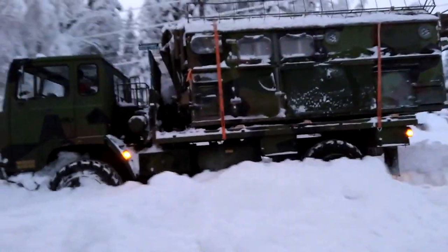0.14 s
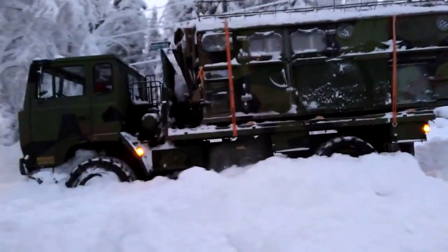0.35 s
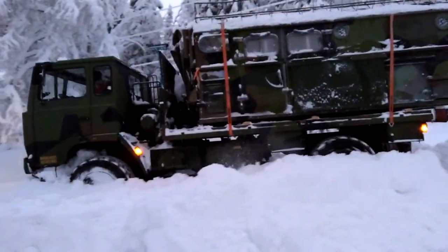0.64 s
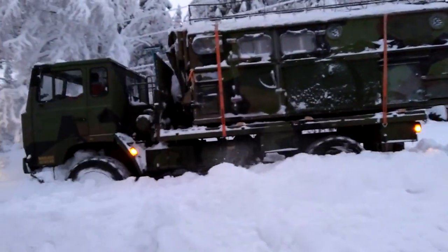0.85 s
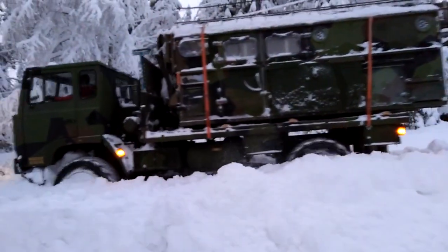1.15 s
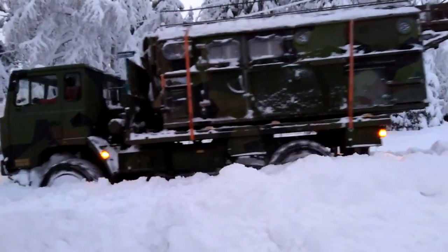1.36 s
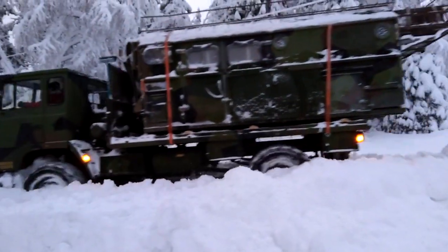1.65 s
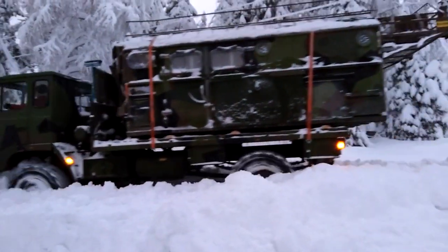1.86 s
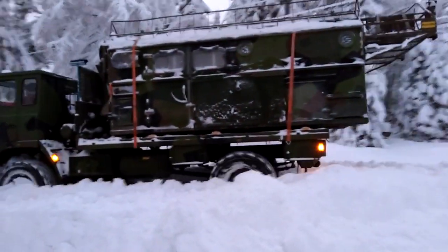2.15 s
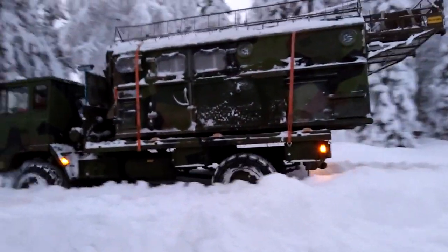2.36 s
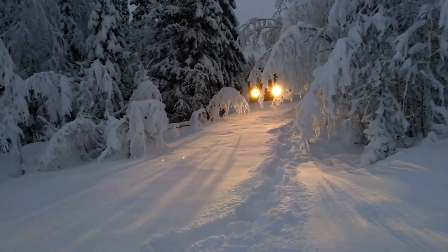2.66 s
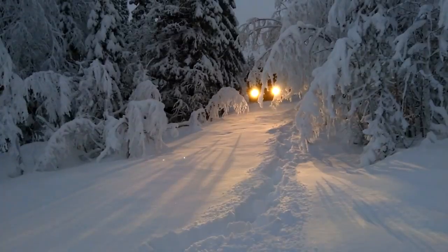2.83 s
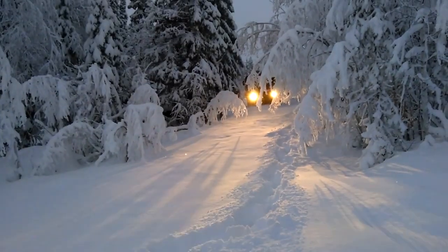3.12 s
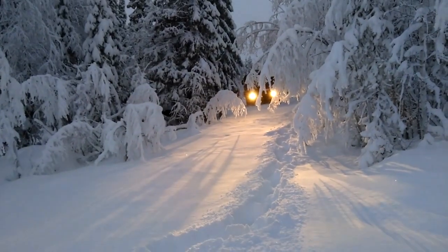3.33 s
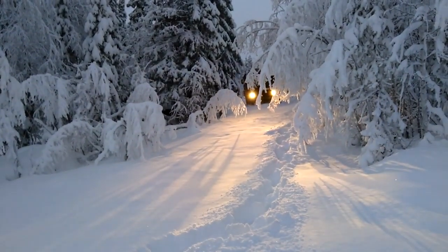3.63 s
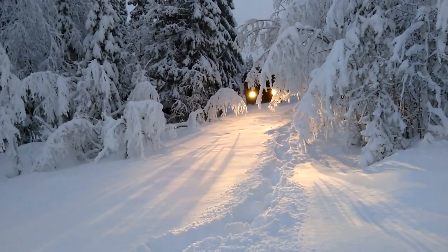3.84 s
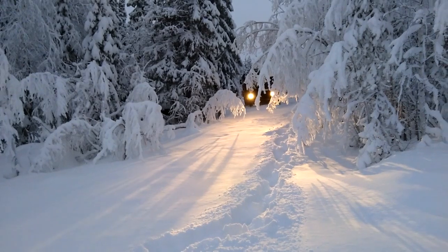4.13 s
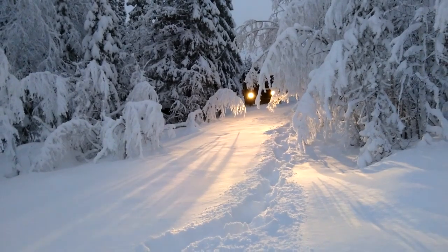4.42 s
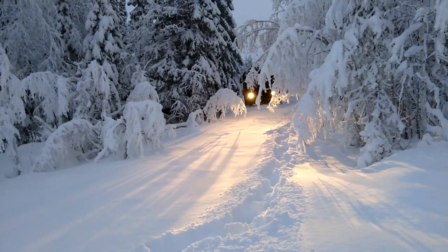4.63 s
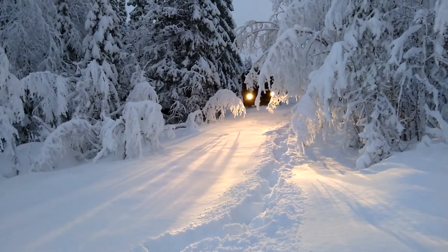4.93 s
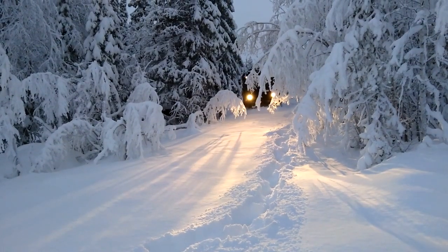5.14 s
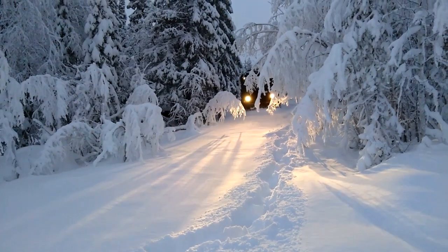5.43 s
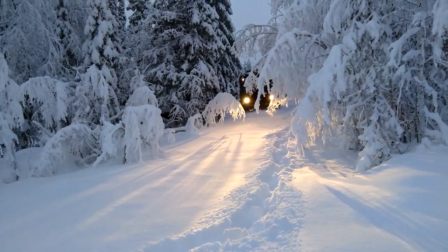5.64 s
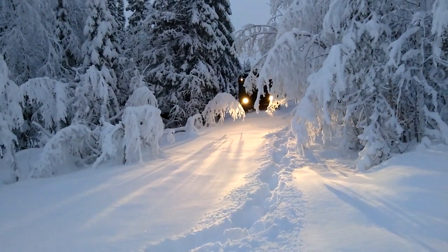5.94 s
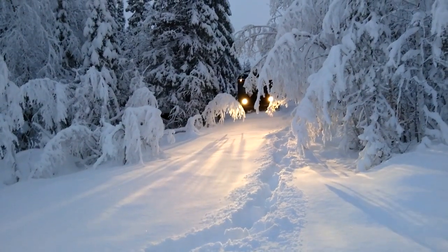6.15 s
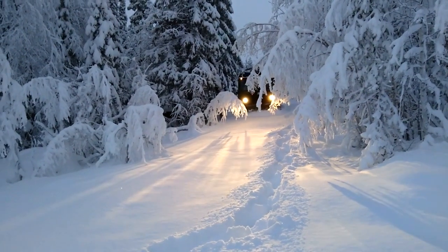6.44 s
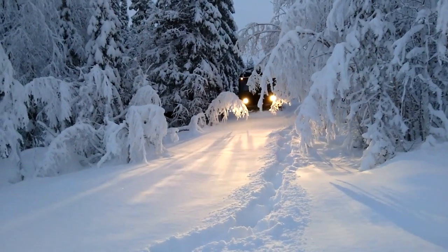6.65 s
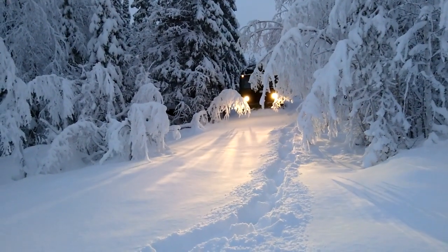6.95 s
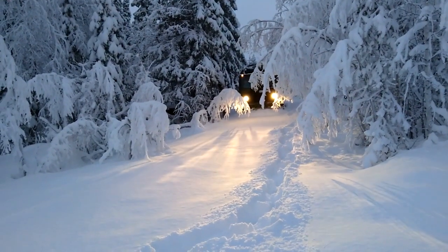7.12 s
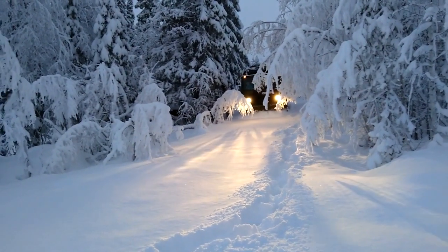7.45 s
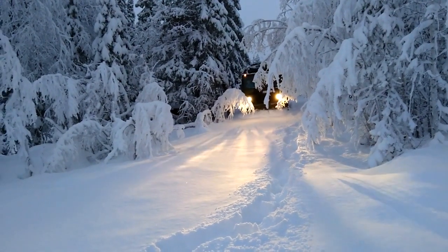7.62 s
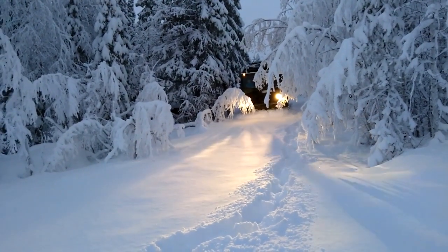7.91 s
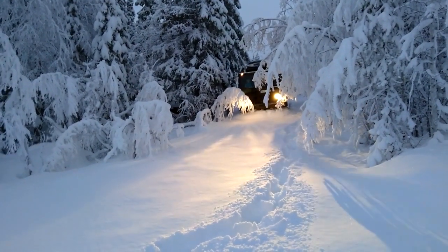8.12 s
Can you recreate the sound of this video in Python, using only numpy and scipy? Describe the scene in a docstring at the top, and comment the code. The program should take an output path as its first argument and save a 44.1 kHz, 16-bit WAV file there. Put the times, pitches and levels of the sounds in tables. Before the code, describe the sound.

Close diesel truck drone and clatter with squeaking snow under the tyres, cutting to the same engine faint and crawling nearer.

```python
"""A six-cylinder diesel truck labours past through deep snow. Periodic firing pulses make its exhaust
drone; the same firings knock the block, rattle loose parts, ring steel panels and tick the injectors.
Under the tyres the snow fractures and squeaks. Then, abruptly, the truck is far down a forest road,
crawling nearer at low revs, with a hollow chuff once in every engine cycle."""
import sys
import numpy as np
from scipy import signal
from scipy.fft import rfft, irfft, next_fast_len
from scipy.io import wavfile
from scipy.ndimage import uniform_filter1d, map_coordinates

SR = 44100
rng = np.random.default_rng(int(sys.argv[2]) if len(sys.argv) > 2 else 0)


def unload_wav(signal):
    """Save mono or channel-first audio to the path in sys.argv[1] as 16-bit WAV at rate SR, clipped to [-1, 1]."""
    wavfile.write(
        sys.argv[1],
        SR,
        np.round(np.clip(np.atleast_2d(signal).T, -1, 1) * 32767).astype(np.int16),
    )


N = 365148
TIME = np.arange(N) / SR
BURST_TIME = np.arange(SR // 16) / SR
FAR_START_S = 2.6533

# Engine speed. Each row: time in seconds, crank speed in rpm.
NEAR_RPM = [(0, 976), (0.6, 1118), (0.9, 1212), (1.25, 1258), (1.5, 1209), (1.75, 1197), (2.1, 1222),
            (2.4, 1203), (2.66, 1185)]
FAR_RPM = [(2.66, 972), (3.2, 984), (3.7, 987), (4.95, 972), (5.35, 961), (5.7, 942), (6.5, 958), (7, 951),
           (8.28, 961)]
def engine_cycles(speed):
    """Phase is the integral of speed; a four-stroke cycle takes two crank turns."""
    turned = np.cumsum(curves(speed)[0]) / (120 * SR)
    return turned - np.interp(speed[0][0], TIME, turned)

# Exhaust harmonics. Each row: multiple of the cycle rate, relative level in dB.
NEAR_ORDERS = [(4, -25), (5, -23.5), (6, 0), (7, -23), (9, -19.5), (11, -28), (12, -28), (15, -31),
               (20, -32), (21, -32), (22, -33), (24, -32), (26, -32), (27, -36), (29, -36), (30, -35),
               (31, -38)]
FAR_ORDERS = [(5, -12), (6, 1), (7, -17), (9, -11), (11, -22), (12, -7), (15, -17), (29, -23)]
def exhaust(cycle, orders, flutter_db, lug_db=0):
    """Periodic pulses form a harmonic series: order 6 is the firing rate; unequal cylinders add others."""
    tones = sum(amp(db + (round(k) > 6) * lug_db) * np.sin(2 * np.pi * (round(k) * cycle + rng.random()))
                for k, db in orders)
    return np.sqrt(2) * tones * amp(flutter_db * wobble(15))

# Engine effort. Each row: time in seconds, base level of the exhaust in dB.
EFFORT = [(0.0, -26.5), (0.02, -26.5), (0.6, -23), (0.63, -22.5), (1.26, -20.5), (1.36, -23), (2.14, -22.5),
          (2.62, -25)]
def loaded_exhaust(cycle, effort_db, working_rpm=1186, lug_db_per_rpm=0.0297):
    """Load strengthens the pulses; lugging below working speed hardens their overtones."""
    lug_db = lug_db_per_rpm * np.maximum(working_rpm - curves(NEAR_RPM)[0], 0)
    return amp(effort_db + 0.17) * exhaust(cycle, NEAR_ORDERS, flutter_db=0, lug_db=lug_db)

# Firings. Each row: place in the cycle in firings (0-6), relative rattle and tick levels in dB.
NEAR_KNOCKS = [(0.33, -1, 14), (1.33, 0.5, 15), (2.3, 0, 14.5), (3.3, -1, 15), (4.35, -1.5, 11.5),
               (5.38, -2, 9)]
FAR_KNOCKS = [(0.02, -1, 1), (1.05, 0, -1), (2.1, -1, -2), (2.97, 0, 1), (4.1, -2, -5), (5.0, 0, 1.5)]
def clatter(cycle, knocks, tick_s, tail_db, memory, scatter_db):
    """Impact excitation: each firing gives a rattle of loose parts and an injector tick's envelope."""
    rattle, tick = np.zeros((2, N)), np.zeros(N)
    shake = swell(0.004) + amp(tail_db) * swell(0.017)  # chassis and trees prolong the rattle
    for place, rattle_db, tick_db in knocks:
        starts = each_cycle(cycle, place)
        size = amp(scatter_db * rng.standard_normal((len(starts), 1)))
        envelope = amp(rattle_db) * size * shake
        rattle += [lay(starts, envelope * alike_noise(len(starts), memory)) for _ in range(2)]
        tick += lay(starts, amp(tick_db) * size * swell(tick_s))
    return unit(rattle), unit(tick)

# Block and chassis spectra. Each row: frequency in Hz, relative spectral density in dB.
NEAR_BLOCK = [(240, -14.5), (400, -26), (453, -7.5), (506, -0.5), (678, 2), (800, 0.5), (956, 1),
              (1050, 1.5), (1230, 1.5), (1500, -3.5), (1640, -2), (1930, -1), (2110, -15), (2300, -40),
              (2990, -43), (5060, -120)]
FAR_BLOCK = [(240, -31), (420, -30), (500, -3), (532, -7), (590, -1), (673, -5), (729, -4), (850, -2),
             (1040, -0.5), (1130, -4), (1330, -7.5), (1480, -13), (1700, -9), (1960, -10), (2300, -25),
             (2990, -85), (5060, -120)]
NEAR_BOOM = [(59, -10), (100, 4), (161, -6.5), (193, -6), (258, -2), (392, -10), (430, -18.5), (560, -47),
             (950, -120)]
FAR_BOOM = [(65, -23), (110, 0.5), (124, -4.5), (156, -5.5), (392, -8), (430, -4.5), (560, -15),
            (950, -120)]
def structure(rattle, spectrum, noise_gain):
    """Forced vibration: the block or chassis filters the rattle and a steady noise."""
    return coloured(rattle + noise_gain * noise(), spectrum)

# Panel modes. Each row: place in firings (0-6), frequency in Hz, first and second relative level in dB.
NEAR_RINGS = [(0.36, 860, -29.5, -35), (0.45, 1930, -38, -33), (0.8, 1940, -42, -35),
              (1.1, 1890, -36.5, -38), (1.3, 775, -36, -29), (1.42, 2950, -35.5, -41),
              (1.43, 1290, -31, -39), (1.46, 970, -28, -31), (1.49, 1810, -34.5, -41),
              (2.33, 1850, -35.5, -38), (2.36, 2880, -34.5, -45), (2.36, 3490, -36.5, -46),
              (2.37, 860, -24, -25.5), (2.55, 1290, -35, -31), (3.3, 890, -27.5, -26.5),
              (3.42, 2950, -34.5, -48), (3.42, 3480, -38, -47), (3.5, 1780, -36, -36),
              (4.37, 1890, -33, -44), (4.4, 2850, -38, -47), (4.42, 950, -28.5, -37), (4.62, 710, -42, -31),
              (5.28, 1310, -39, -33), (5.41, 900, -29.5, -36), (5.43, 1790, -35, -44)]  # from beside the engine, then from behind
FAR_RINGS = [(0.12, 1940, -55, -56), (0.17, 990, -38, -41.5), (0.93, 1660, -51, -56),
             (0.96, 990, -41.5, -40.5), (1.02, 560, -45, -44), (1.12, 1980, -64, -52),
             (1.33, 1290, -49, -49), (2.0, 1780, -60, -50), (2.09, 960, -39, -38), (2.4, 970, -41, -49),
             (2.9, 970, -42.5, -38), (3.0, 1720, -52, -48), (3.1, 530, -49, -46), (3.3, 1080, -45, -50),
             (3.64, 950, -43, -47), (4.14, 990, -34, -37.5), (4.2, 1660, -65, -50), (4.98, 1750, -55, -45),
             (5.0, 600, -48, -44), (5.02, 860, -39, -39), (5.36, 970, -44, -50), (5.42, 1940, -54, -52),
             (5.62, 950, -46, -52), (5.86, 990, -58, -43.5)]  # far up the road, then nearer
def panels(cycle, rings, turn_s, turn_length_s, rise_at_1khz_s, scatter_db):
    """Pistons and valve gear strike damped modes; directivity shifts their balance as the truck moves."""
    track = np.zeros(N)
    turned = (1 + np.tanh((TIME - turn_s) / turn_length_s)) / 2
    for place, hz, first_db, second_db in rings:
        starts = each_cycle(cycle, place)
        force, detune = rng.standard_normal((len(starts), 2)).T[..., None]
        db = first_db + (second_db - first_db) * turned[starts, None] + scatter_db * force
        blow = swell(rise_at_1khz_s * (1000 / hz) ** 0.3) ** 2
        tone = np.sin(2 * np.pi * hz * (1 + 0.005 * detune) * BURST_TIME)
        track += lay(starts, amp(db) * blow * tone)
    return track

# Cover modes. Each row: frequency in Hz, bandwidth in Hz, relative level in dB.
COVER_MODES = [(915, 110, 2), (1222, 77, -3), (1890, 59, -8), (2904, 120, -2), (3520, 98, -3),
               (4080, 130, -15), (4900, 140, -14)]
def covers(rattle):
    """Thin steel covers respond to the engine's shaking as second-order resonators."""
    def response(f):
        return sum(amp(db) * 1j * f * width / (hz * hz - f * f + 1j * f * width)
                   for hz, width, db in COVER_MODES)
    return unit(filtered(rattle, response))

# Injector spectra. Each row: frequency in Hz, relative spectral density in dB.
NEAR_HISS = [(1290, -22), (2150, -0.5), (2420, 3.5), (2650, -2), (2940, 2.5), (3130, 0), (3480, 0.5),
             (3700, -3.5), (4150, 2.5), (4500, -5), (5330, -7), (5880, -9), (6250, -4), (6750, -4.5),
             (7500, -18.5), (8070, -21.5), (11400, -15.5), (12600, -24), (14300, -19)]
FAR_HISS = [(1290, -9.5), (2200, -7.5), (2550, -5), (2800, -2.5), (3120, -4), (3240, 1), (3600, -3.5),
            (3900, 2.5), (4150, -3.5), (4380, 1), (4600, -1.5), (5130, -1.5), (5950, -11.5), (6330, -8.5),
            (6800, -10), (8270, -18), (13800, -28.5), (14300, -37)]
def injectors(rattle, tick, spectrum, ripple_db, spacing_hz):
    """Ticks modulate a hiss, coloured by the many narrow resonances of the engine's castings."""
    ticking = (1 + tick) * noise() + 0.7 * rattle
    grid = np.arange(0, SR / 2, spacing_hz)
    heights = np.clip(rng.standard_normal(4096)[:len(grid)], -2.5, 1.2)
    rippled = filtered(ticking, lambda hz: amp(ripple_db * np.interp(hz, grid, heights)))
    return coloured(rippled, spectrum)

def whine(turns, waver_db, jitter_turns=0):
    """A rotating part hums at a multiple of engine speed, with slight phase modulation."""
    phase = turns + jitter_turns * wobble(30)
    tone = np.sin(2 * np.pi * phase + 0.04 * wobble(3.16))
    return unit(tone * amp(waver_db * wobble(5.5)))

# Gear hums. Each row: multiple of the cycle rate, relative level in dB.
GEAR_ORDERS = [(63, -3), (69, -6), (72, -4), (75, 0)]
def gears(cycle):
    """High harmonics of the cycle, likely from the meshing of the timing gears."""
    return sum(amp(db) * whine(k * cycle, waver_db=2.5, jitter_turns=0.036) for k, db in GEAR_ORDERS)

def chuff(cycle, centre_hz, width_hz, place, spread_rad):
    """Band-limited noise gated once a cycle: a hollow puff, likely the air compressor's intake."""
    gate = np.exp((np.cos(2 * np.pi * (cycle - place / 6)) - 1) / spread_rad ** 2)
    puff = filtered(gate * noise(), lambda hz: 1 / (1 + (2 * (hz - centre_hz) / width_hz) ** 2))
    return amp(-58.5) * hump(6.04, 2.7) * unit(puff)

# Load bed spectrum. Each row: frequency in Hz, relative spectral density in dB.
BED_TONE = [(450, -39), (600, 7), (800, 11), (950, -18), (1300, -55)]
def load_bed(rattle):
    """The bed drums in forced vibration, loudest as the rear comes by."""
    return amp(-48.5) * hump(2.1, 0.37) * coloured(rattle, BED_TONE)

# An axle in a drift. Each row: peak time in seconds, half-width in seconds, level in dB.
DRIFTS = [(0.033, 1, -46), (1.827, 0.95, -47.5)]
# Crunch spectrum. Each row: frequency in Hz, relative spectral density in dB.
CRUNCH = [(1200, -24), (3000, 0.5), (4900, 9), (6200, -3.5), (8000, -4), (11500, -7.5), (14000, -18)]
def snow(grains_per_s, clump_db):
    """Brittle fracture: the tyres crush the crust in clumps of tiny cracks."""
    cracks = (rng.random(N) < grains_per_s / SR) * noise()
    ploughing = sum(amp(db) * hump(s, length) for s, length, db in DRIFTS)
    return ploughing * coloured(cracks * amp(clump_db * wobble(38.4)), CRUNCH)

# Packed snow under a tyre, and a loose steel fitting as the rear rocks by.
# Each row: start in seconds, level in dB, frequency in Hz.
SNOW_SQUEAKS = [(0.186, -43, 4820), (0.299, -39.5, 5430), (0.598, -42, 5510), (1.003, -40.5, 5250),
                (1.57, -46, 4950), (1.722, -45, 4370), (1.755, -44, 5050), (1.787, -39, 5170),
                (1.885, -45, 5200), (2.1, -46, 5000), (2.178, -47, 5200), (2.3, -44, 4570),
                (2.318, -46, 5000), (2.417, -45, 5300), (2.464, -45.5, 5300), (2.522, -45, 4560)]
FITTING_CHATTER = [(1.868, -39, 1900), (2.052, -41, 1950), (2.117, -39.5, 1900), (2.168, -39.5, 1880),
                   (2.272, -40, 1890), (2.308, -41, 1950), (2.372, -41.5, 1930)]
def rasps(events, peak_s, width_hz):
    """Random modulation widens a tone into a narrow band: a short squeak or chatter."""
    track = np.zeros(N)
    for s, db, hz in events:
        roughness = uniform_filter1d(rng.standard_normal(len(BURST_TIME)), int(SR / width_hz))
        rasp = unit(roughness * np.sin(2 * np.pi * hz * BURST_TIME))
        track[int(s * SR):][:len(BURST_TIME)] += amp(db) * swell(peak_s) * rasp
    return track

def near_truck(abreast_s=0.36, speed_m_per_s=3.62, distance_m=4.05):
    """Engine noise follows effort and spherical spreading; the knock is sharpest where it is loudest."""
    cycle = engine_cycles(NEAR_RPM)
    effort_db, = curves(EFFORT)
    nearness = distance_m / np.hypot(distance_m, speed_m_per_s * (TIME - abreast_s))
    drive_db = 0.61 * (effort_db - effort_db.max()) + 20 * np.log10(nearness)
    drive, soft_drive = amp(drive_db), amp(0.41 * drive_db)
    sharpness = amp(5.2 * (drive_db - drive_db.max()))
    rattle, tick = clatter(cycle, NEAR_KNOCKS, tick_s=0.005, tail_db=-4, memory=0.87, scatter_db=0.5)
    tick *= 0.2 + 0.64 * sharpness
    pair = amp(-40.5) * soft_drive * structure(rattle, NEAR_BOOM, noise_gain=0.71)
    pair += amp(-32.5) * drive * structure(rattle, NEAR_BLOCK, noise_gain=0.45)
    pair += amp(-39) * drive * sharpness * covers(rattle)
    pair += amp(-40.5) * soft_drive * injectors(rattle, tick, NEAR_HISS, ripple_db=3.5, spacing_hz=30)
    pair += snow(grains_per_s=6000, clump_db=2.5) + load_bed(rattle)
    rings = panels(cycle, NEAR_RINGS, turn_s=1.5, turn_length_s=0.3, rise_at_1khz_s=0.0026, scatter_db=1)
    pair[0] += amp(0.5) * drive * rings
    pair[0] += rasps(SNOW_SQUEAKS, peak_s=0.005, width_hz=900)
    pair[0] += rasps(FITTING_CHATTER, peak_s=0.007, width_hz=160)
    drone = loaded_exhaust(cycle, effort_db)
    drone += amp(-46.5) * soft_drive * whine(19.22 * cycle, waver_db=2.5)  # belt
    drone += amp(-54.5) * hump(1.88, 0.62) * whine(53.2 * cycle, waver_db=0)  # driveline
    return stereo(pair, NEAR_WIDTH, NEAR_LEAN, direct=0.61) + pan(drone, balance_db=0.94, lag_samples=4)

# The approach. Each entry, by part: starting base level in dB, rise in dB per second.
APPROACH = {"exhaust": (-52, 0.83), "boom": (-65.5, 1.4), "hiss": (-58.5, 0.57),
            "bright clatter": (-83, 3.8), "block": (-51.5, 0.84), "gears": (-67.5, 1.8)}
def nearing(part):
    """Each part's gain grows exponentially as the far truck nears."""
    first_db, db_per_s = APPROACH[part]
    return amp(first_db + db_per_s * (TIME - FAR_START_S))

def far_truck():
    """Transmission depends on frequency: the diesel knock carries best through the trees."""
    cycle = engine_cycles(FAR_RPM)
    rattle, tick = clatter(cycle, FAR_KNOCKS, tick_s=0.0037, tail_db=0, memory=0.82, scatter_db=0.6)
    pair = nearing("boom") * structure(rattle, FAR_BOOM, noise_gain=1.04)
    pair += nearing("block") * structure(rattle, FAR_BLOCK, noise_gain=0.45)
    tick *= 0.42 * amp(2.5 * wobble(900))  # each tick is a cluster of tiny clicks
    pair += nearing("hiss") * injectors(rattle, tick, FAR_HISS, ripple_db=2.5, spacing_hz=35)
    pair += chuff(cycle, centre_hz=1343, width_hz=120, place=3.72, spread_rad=0.45)
    bright = coloured(rattle, [(1450, -36), (1700, -16), (2000, 0.5), (2400, -38)])
    pair += nearing("bright clatter") * bright  # comes through as the truck clears the trees
    pair[0] += amp(0.7) * panels(cycle, FAR_RINGS, turn_s=5.7, turn_length_s=0.7,
                                 rise_at_1khz_s=0.0029, scatter_db=0.6)
    drone = amp(-2) * nearing("exhaust") * exhaust(cycle, FAR_ORDERS, flutter_db=1)
    drone += nearing("gears") * gears(cycle)
    return stereo(pair, FAR_WIDTH, FAR_LEAN, direct=0.51) + pan(drone, balance_db=1.5, lag_samples=-2)

# Background spectrum. Each row: frequency in Hz, relative spectral density in dB.
AIR = [(15, -35), (35, -20), (70, 8), (130, -14), (400, -7), (2000, -31)]
def air(white, level_db):
    """Ambient noise: a steady low rumble."""
    return amp(level_db) * coloured(white, AIR)

# Stereo width. Each row: frequency in Hz, side level relative to mid in dB.
NEAR_WIDTH = [(60, -24), (180, -23), (335, -18), (560, -14), (800, -7), (1280, -3), (1700, 5), (2090, 7),
              (2500, -1), (2940, -3), (4130, 2), (5700, 3), (6700, -7), (12000, -8)]
FAR_WIDTH = [(60, -20), (180, -16), (800, -17), (1000, -16), (1290, -7), (1690, -12), (2090, -10),
             (2500, -2), (4130, -2), (5700, 1), (6700, -12), (12000, -16)]
# Stereo phase. Each row: frequency in Hz, phase of side against mid in radians.
NEAR_LEAN = [(300, 1), (900, 1.75), (2050, 1.6), (2500, 0.3), (3500, 1.3), (4900, 1.5)]
FAR_LEAN = [(500, -0.6), (1000, -0.4), (1400, -1.1), (2500, -0.4), (3400, -1.45), (5700, -1.55)]
def stereo(pair, width, lean, direct):
    """Partial coherence: the side mixes phase-shifted direct sound with scatter, more so in the treble."""
    mid, scattered = pair
    share = lambda hz: direct / (1 + (hz / 4500) ** 2)
    gain = lambda hz: amp(along(width, hz))
    side = filtered(mid, lambda hz: np.sqrt(share(hz)) * np.exp(1j * along(lean, hz)) * gain(hz))
    side += filtered(scattered, lambda hz: np.sqrt(1 - share(hz)) * gain(hz))
    return np.array([mid + side, mid - side])

def pan(x, balance_db, lag_samples):
    """Level and time differences give direction: the right channel is quieter and shifted by the lag."""
    return np.array([x, np.roll(x, lag_samples)]) * amp([[balance_db / 2], [-balance_db / 2]])

def amp(db):
    """Decibels to gain."""
    return 10 ** (np.asarray(db) / 20)

def unit(x):
    """Normalise to rms 1."""
    return x / np.sqrt(np.mean(x ** 2) + 1e-20)

def along(points, hz):
    """Interpolate (Hz, value) points on a log axis."""
    f, v = np.transpose(points)
    return np.interp(np.log(hz + 1), np.log(f + 1), v)

def curves(rows):
    """Interpolate each column after the time to one value per sample."""
    s, *cols = np.transpose(rows)
    return [np.interp(TIME, s, c) for c in cols]

def wobble(rate):
    """A random spline, rate knots a second."""
    return map_coordinates(rng.standard_normal(int(N * rate / SR) + 4), [TIME * rate], order=2)

def filtered(x, response):
    """Filtering multiplies the spectrum by a frequency response."""
    m = next_fast_len(N + 8192, True)
    return irfft(rfft(x, m) * response(np.fft.rfftfreq(m, 1 / SR)), m)[..., :N]

def coloured(x, spectrum):
    """Spectral shaping, at rms 1."""
    return unit(filtered(x, lambda hz: amp(along(spectrum, hz))))

def noise():
    """Two uncorrelated white noises, for the direct and the scattered sound."""
    return rng.standard_normal((2, N))

def alike_noise(count, memory):
    """Correlated rows of noise: the same parts rattle in every cycle."""
    rows = rng.standard_normal((count, len(BURST_TIME)))
    rows[1:] *= np.sqrt(1 - memory ** 2)
    return signal.lfilter([1], [1, -memory], rows, axis=0)

def swell(peak_s):
    """A critically damped envelope, 1 at peak_s."""
    age = BURST_TIME / peak_s
    return age * np.exp(1 - age)

def hump(centre_s, half_width_s):
    """A Gaussian envelope, 1 at its top."""
    return np.exp(-((TIME - centre_s) / half_width_s) ** 2)

def each_cycle(cycle, place):
    """The samples at which the cycle reaches one phase, counted in firings."""
    marks = np.arange(np.floor(cycle[0]), cycle[-1]) + place / 6
    return np.searchsorted(cycle, marks[(marks > cycle[0]) & (marks < cycle[-1])])

def lay(starts, bursts):
    """Superpose one burst per start."""
    samples = starts[:, None] + np.arange(len(BURST_TIME))
    return np.bincount(samples.ravel(), bursts.ravel(), N)[:N]

def scene():
    """Truck and air superpose: first beside the truck, then far ahead of it."""
    near = near_truck() + air(noise(), level_db=-55.5)
    far = far_truck() + air(noise()[0], level_db=-62.5)
    return np.where(TIME < FAR_START_S, near, far)

def record(dry):
    """An ideal low-pass filter limits the bandwidth."""
    return filtered(dry, lambda hz: hz < 14350)

dry = scene()
out = record(dry)
unload_wav(out)
```